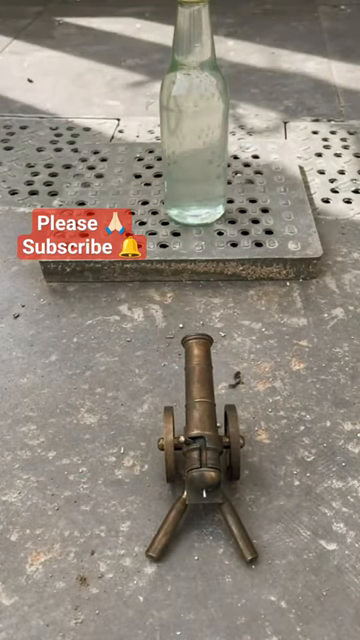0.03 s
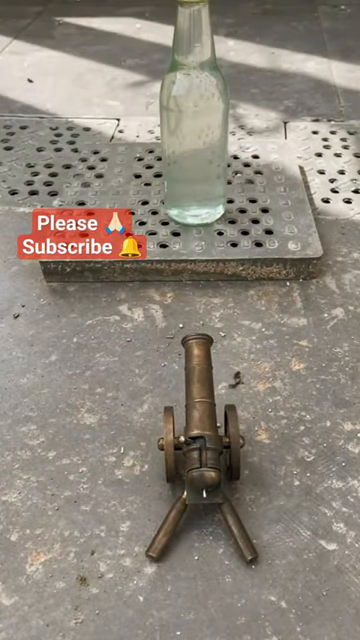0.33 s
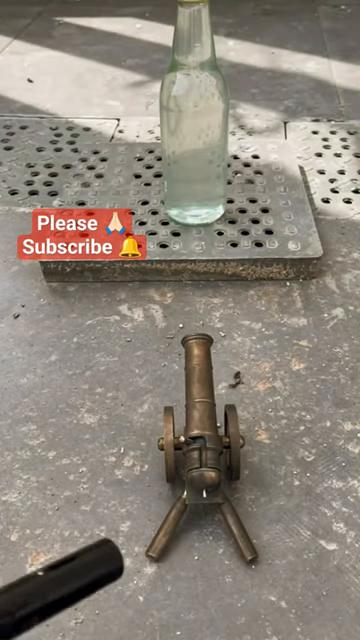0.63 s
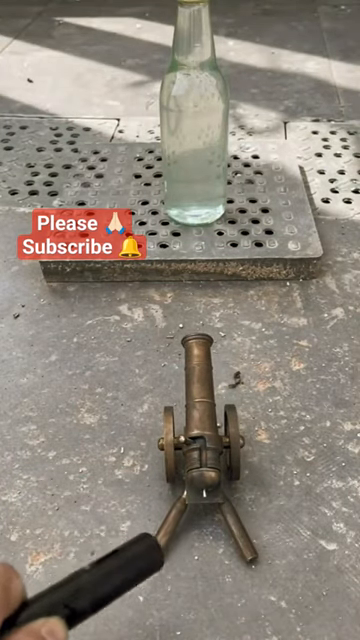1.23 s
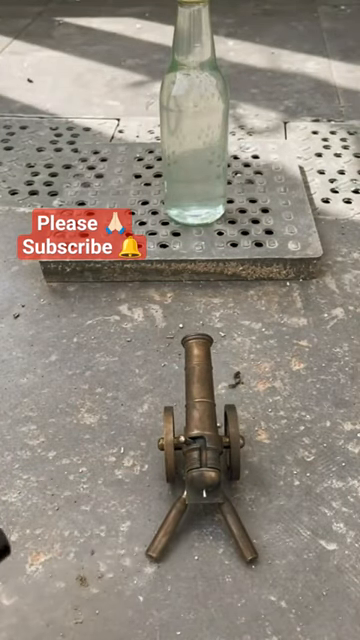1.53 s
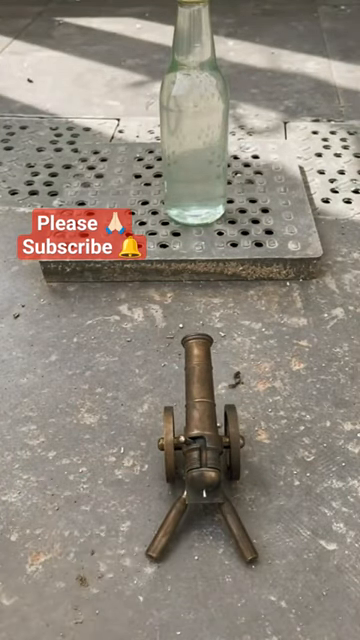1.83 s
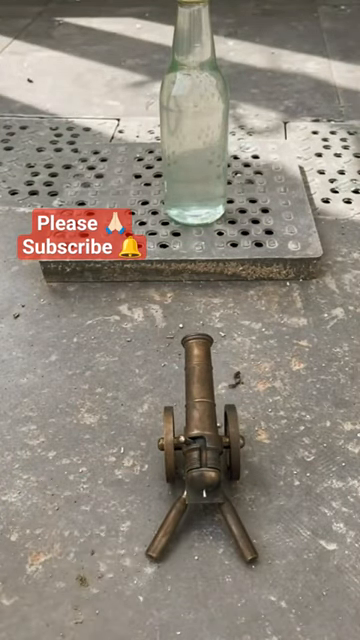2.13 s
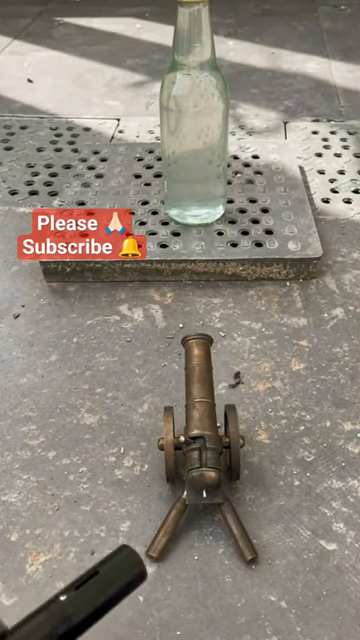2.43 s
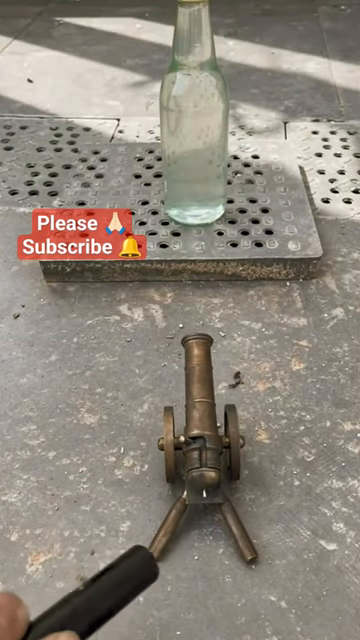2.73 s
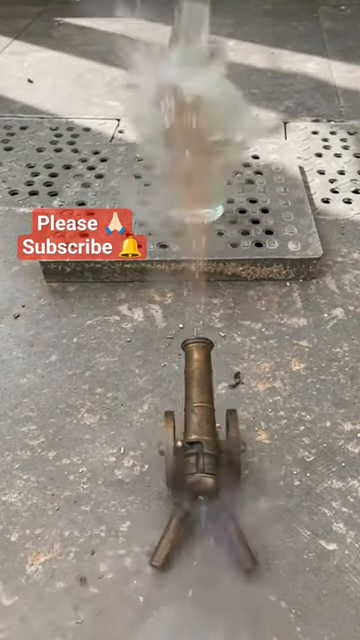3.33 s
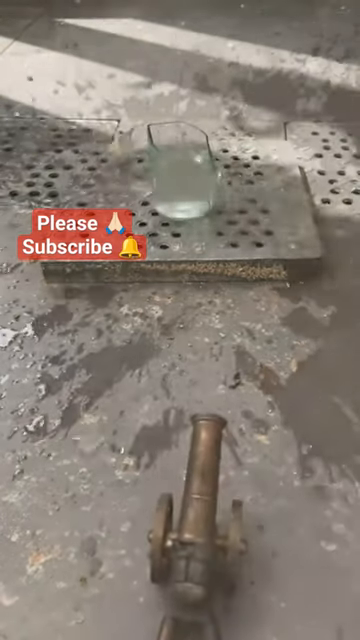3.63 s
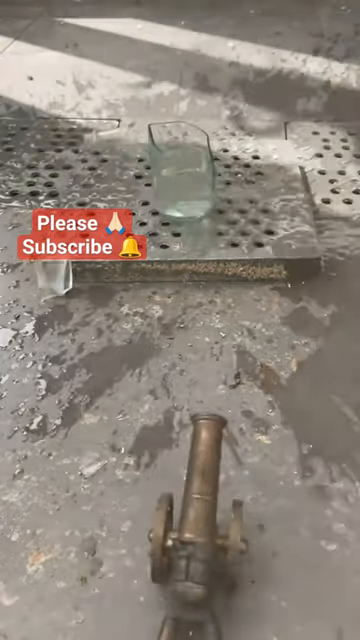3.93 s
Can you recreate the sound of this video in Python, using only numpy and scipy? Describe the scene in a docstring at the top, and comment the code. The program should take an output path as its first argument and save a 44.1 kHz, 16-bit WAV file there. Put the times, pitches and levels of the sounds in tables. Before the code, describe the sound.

A small brass cannon goes off with a sharp crack and low boom, after a close lighter click and a short sputter. A bottle bursts right after, with tinkling glass and splashing water, over wind or traffic rumble.

```python
"""Toy cannon and glass bottle

A toy brass cannon stands on a concrete floor outdoors, in a low rumble of wind or traffic.
A lighter snaps, the priming fizzes and spits, and the cannon fires with a crack and a low boom.
A glass bottle of water cracks and bursts; shards clink and water spatters over the ground."""
import sys
import numpy as np
from scipy import signal
from scipy.fft import rfft, irfft
from scipy.io import wavfile
from scipy.ndimage import uniform_filter1d

SR = 44100
rng = np.random.default_rng(int(sys.argv[2]) if len(sys.argv) > 2 else 0)


def to_wav(s):
    """Save 16-bit WAV."""
    ch = np.atleast_2d(s).T  # columns
    pcm = np.round(np.clip(ch, -1, 1) * 32767)  # PCM
    wavfile.write(sys.argv[1], SR, pcm.astype(np.int16))


N = 176400
T = np.arange(N) / SR
HIT_SAMPLES, LEAD_S = 16384, .03  # each one-shot peaks LEAD_S into its buffer
HIT_T = np.arange(HIT_SAMPLES) / SR - LEAD_S

# Vent jet, two muzzle surges, crack of the ball, a reflection: peak_s, level_db, rise_s, t60_s
BLASTS = [(3.412, -22, .0015, .06), (3.4205, -13.5, .003, .024), (3.4255, -18, .001, .016),
          (3.4345, -11.5, .0008, .02), (3.449, -21, .0015, .1)]
# Modes of the brass barrel: pitch_hz, level_db, t60_s
BARREL_MODES = [(2476, -25, .16), (3535, -28, .12), (4720, -33, .1), (5845, -30, .08), (6580, -30, .13)]
# Glass cracking and landing: peak_s, body_db, ring_db, treble_db, rise_s, t60_s
CRACKS = [(3.5845, -33, -23, -26, .0008, .05), (3.589, -40, -31, -24, .002, .04),
          (3.62, -37, -39, -46, .002, .06), (3.672, -41, -35, -39, .006, .1),
          (3.7018, -13, -12.5, -23, .0006, .026), (3.7075, -24, -26, -17, .001, .022),
          (3.726, -48, -38, -28, .003, .05), (3.767, -44, -37, -26, .003, .14),
          (3.807, -29, -33, -35, .002, .11), (3.951, -24, -39, -42, .001, .04)]
# Shards that ring out: peak_s, pitch_hz, level_db, t60_s
SHARDS = [(3.585, 4660, -32, .3), (3.585, 7745, -34, .12), (3.585, 9135, -33, .12), (3.665, 4270, -36, .2),
          (3.702, 3828, -36, .6), (3.704, 5000, -33, .3), (3.706, 4897, -32, .25), (3.74, 3016, -37, .35),
          (3.765, 9130, -27, .22), (3.765, 10950, -33, .22), (3.768, 8460, -33, .18), (3.77, 8095, -34, .2),
          (3.775, 10370, -33, .25), (3.772, 6720, -32, .4), (3.79, 1965, -36, .6), (3.8, 10165, -35, .2),
          (3.806, 6720, -32, .15), (3.838, 4657, -32, .2), (3.845, 3828, -33, .35), (3.875, 6720, -42, .4),
          (3.905, 7745, -40, .3), (3.925, 4998, -27, .18), (3.945, 5420, -33, .25), (3.952, 6720, -34, .2),
          (3.952, 4270, -39, .1)]
# Soft handling knocks and puffs of priming: peak_s, level_db, centre_hz, t60_s
KNOCKS = [(1.953, -27.5, 700, .055), (2.733, -33, 560, .03), (2.796, -30.5, 760, .05),
          (2.835, -32.5, 850, .03)]
SPUTTERS = [(3.122, -37, 800, .03), (3.166, -34, 1350, .05), (3.225, -38.5, 850, .04),
            (3.262, -37.5, 800, .05), (3.345, -30, 700, .06)]

# Fader moves: time_s, level_db
BOOM_FADER = [(3.48, -45), (3.53, -30), (3.56, -20), (3.59, -26), (3.64, -21), (3.69, -25), (3.73, -42)]
SPLASH_FADER = [(3.48, -48), (3.57, -46), (3.6, -36), (3.64, -37), (3.72, -34), (3.76, -34), (3.82, -31.5),
                (3.88, -35.5), (4, -37)]
CRUMB_FADER = [(3.47, -49), (3.54, -50), (3.62, -44), (3.69, -41), (3.74, -38), (3.79, -33), (3.83, -37),
               (3.87, -46), (3.93, -42), (4, -44)]
FIZZ_FADER = [(3.12, -55), (3.15, -39.5), (3.21, -39.5), (3.32, -39.5), (3.40, -38), (3.46, -52)]
RUMBLE_FADER = [(0, 0), (.6, -1.5), (1.6, 1), (2.4, .5), (3.0, -1), (3.42, -2), (3.5, -19), (3.76, -15),
                (3.86, -5), (4, -4.5)]
HISS_FADER = [(0, -61), (.4, -57), (.85, -54), (1.2, -55), (1.4, -51), (1.65, -55), (1.97, -52),
              (2.02, -59), (2.3, -61), (2.6, -57), (2.82, -51), (3.0, -52), (4, -55)]

# Tone colour of each layer: frequency_hz, relative_db
BLAST_EQ = [(40, 11), (110, 16), (250, 11), (600, 3), (1050, 5), (1700, -1), (2500, 1), (3600, -3),
            (4700, -7), (5300, -13), (5850, -6), (6300, -17), (6700, -4), (7150, -5), (7600, -22),
            (10500, -17), (13000, -19)]
TAIL_EQ = [(40, 6), (110, 7), (300, 3), (700, 5), (1300, 1), (2500, -1), (3100, -1), (3700, -5), (4700, -2),
           (5800, -15), (6900, -3), (7800, -24), (10500, -18), (13000, -21)]
GLASS_BODY_EQ = [(350, -14), (700, -8), (1100, -3), (1700, -2), (2250, 0), (2580, 0), (2850, -10),
                 (3400, -14)]
GLASS_RING_EQ = [(3300, -20), (3750, -4), (4000, -9), (4220, -1), (4450, -5), (4850, 1), (5150, -2),
                 (5500, -20)]
GLASS_TREBLE_EQ = [(5500, -40), (6400, -26), (6800, 3), (7500, 0), (8100, 1), (8900, -4), (10500, 0),
                   (11200, -16), (11900, -20), (12400, -7), (13200, -13)]
SPLASH_EQ = [(200, -3), (600, 2), (1000, 0), (1400, 0), (2300, 4), (2850, -5), (3150, 0), (3450, -4),
             (4000, -2), (5300, -1), (5700, -23), (6400, -25), (7000, -11), (10500, -15), (11500, -25),
             (12400, -3), (13200, -8)]
SPLINTER_EQ = [(1200, -6), (2300, -1), (3000, -3), (4000, 2), (5300, 2), (5600, -28), (6500, -28),
               (6800, -4), (11000, -5)]
LIGHTER_EQ = [(400, -19), (1000, -13), (1700, -15), (2050, -5), (2300, 2.5), (2600, 6), (2950, -5),
              (3350, 3), (3800, -4), (4700, -7), (5200, -4), (6100, -13), (7000, -4), (8100, 1.5),
              (9000, -4), (11000, -3.5), (13500, -5)]
FIZZ_EQ = [(300, -3), (800, 9), (1250, 3), (1800, 1), (2800, -8), (3600, -4), (5000, -1), (5700, -12),
           (6300, -14), (7000, -2), (9000, -8), (11000, -9), (11700, -20), (12500, -10), (13200, -14)]
SPIT_EQ = [(500, 0), (1200, -4), (1800, -8), (2640, -3), (3020, -11), (3500, 3), (4080, -12), (5500, -7),
           (6800, 2), (7800, 2), (9000, -4), (10500, 0), (13000, -6)]
RUMBLE_EQ = [(22, -24), (32, -17), (45, -8.5), (74, -.5), (110, 0), (160, -4), (260, -7), (310, -17),
             (370, -17), (470, -25), (750, -30), (1100, -36), (1500, -48), (2000, -54)]
HISS_EQ = [(400, -20), (1200, -2), (2000, 0), (3200, -2), (4300, 0), (5300, -1), (5800, -17), (6300, -18),
           (6700, -4), (8000, -8), (10700, -11), (11600, -22), (12400, -14), (13200, -18)]

# Stereo image of the shot, close sounds and open air (1 is mono): frequency_hz, correlation
SHOT_IMAGE = [(60, .97), (200, .75), (660, .1), (2200, .45), (5000, .6), (13000, .4)]
NEAR_IMAGE = [(200, .98), (1200, .93), (2200, .75), (5000, .6), (13000, .6)]
AIR_IMAGE = [(110, 1), (200, .993), (360, .95), (660, .72), (1200, .6), (2200, .7), (5000, .6),
             (13000, .55)]


def cannon():
    """Ragged blasts and a pressure push ring the barrel and leave a short tail."""
    out = np.zeros((2, N))
    for peak_s, db, rise_s, t60_s in BLASTS:
        place(out, peak_s, burst(db, rise_s, t60_s, BLAST_EQ, SHOT_IMAGE))
    first_surge_s, second_surge_s = BLASTS[1][0], BLASTS[2][0]
    place(out, second_surge_s, burst(db=-23, rise_s=.006, t60_s=.4, eq=TAIL_EQ, image=SHOT_IMAGE))
    barrel = sum(ring(hz, db, t60_s, rise_s=.005) for hz, db, t60_s in BARREL_MODES)
    place(out, first_surge_s, barrel)
    push_start_s, push_width_s = 3.4262, .0028
    age = np.maximum(T - push_start_s, 0) / push_width_s
    push = amp(-9) * np.minimum(10 * age, 1) * (1 - age) * np.exp(-age)  # pressure, then suction
    lean_left = amp([[1], [-1]])
    return out * lean_left + push


def boom():
    """A sub tone swells after the shot; a thump dives in pitch over it."""
    thump_s, top_hz, end_hz, fall_s, sub_hz = 3.594, 600, 60, .005, 47
    age_s = np.maximum(T - thump_s, 0)
    pitch_hz = end_hz + (top_hz - end_hz) * np.exp(-age_s / fall_s)
    envelope = np.minimum(age_s / .003, 1) * decay(age_s, t60_s=.1)
    thump = amp(-17) * envelope * np.sin(2 * np.pi * np.cumsum(pitch_hz * (age_s > 0)) / SR)
    sub = fader(BOOM_FADER) * np.sin(2 * np.pi * sub_hz * (T - thump_s))
    return thump + sub


def bottle():
    """The glass cracks, shards ring in beating pairs of modes, water and crumbs rain down."""
    water = fader(SPLASH_FADER) * shimmer(grains(SPLASH_EQ, NEAR_IMAGE), bands_db=5, flicker_db=1.2)
    crumbs = shimmer(grains(GLASS_TREBLE_EQ, NEAR_IMAGE), bands_db=7, flicker_db=1.5)
    out = water + fader(CRUMB_FADER) * crumbs
    for peak_s, *band_dbs, rise_s, t60_s in CRACKS:
        bands = zip(band_dbs, (GLASS_BODY_EQ, GLASS_RING_EQ, GLASS_TREBLE_EQ))
        crack = sum(burst(db, rise_s, t60_s, eq, NEAR_IMAGE) for db, eq in bands)
        place(out, peak_s, yard(crack))
    beat_hz = 23
    for peak_s, hz, db, t60_s in SHARDS:
        place(out, peak_s, ring(hz, db, t60_s, rise_s=.003))
        place(out, peak_s, ring(hz + beat_hz, db - 11, t60_s, rise_s=.003))
    return out + splinters()


def splinters(count=90, low_hz=1500, top_hz=11000):
    """Tiny bits of glass land at random, each a brief note riding the splash fader."""
    out, splash_gain = np.zeros((2, N)), fader(SPLASH_FADER)
    for when, pitch, softness, length, left in rng.random((count, 5)):
        peak_s = np.interp(when, [0, 1], [SPLASH_FADER[0][0], T[-1]])
        hz = low_hz + (top_hz - low_hz) * pitch
        db = -5.5 + curve_at(SPLINTER_EQ, hz) - 2.5 * np.log(.05 + softness)
        note = ring(hz, db, t60_s=.11 * (.5 + length), rise_s=.0003)
        pan = np.sqrt(.5 + np.array([[left], [1 - left]]))
        place(out, peak_s, splash_gain[int(peak_s * SR)] * note * pan)
    return out


def ignition():
    """Soft knocks, the snap of the lighter, then priming that fizzes, sputters and spits."""
    out = fader(FIZZ_FADER) * shimmer(grains(FIZZ_EQ, AIR_IMAGE), bands_db=4.5, flicker_db=2)
    for peak_s, db, centre_hz, t60_s in KNOCKS + SPUTTERS:
        eq = bell_eq(centre_hz, octaves=.33)
        place(out, peak_s, burst(db, rise_s=.0015, t60_s=t60_s, eq=eq, image=AIR_IMAGE))
    snap = burst(db=-11.8, rise_s=.0012, t60_s=.009, eq=LIGHTER_EQ, image=NEAR_IMAGE)
    place(out, peak_s=3.0583, sound=yard(snap))
    spit = burst(db=-17.5, rise_s=.002, t60_s=.03, eq=SPIT_EQ, image=NEAR_IMAGE)
    place(out, peak_s=3.3472, sound=yard(spit))
    return out


def yard(hit, wet_db=-16, t60_s=.16):
    """Floor and walls scatter short reflections behind a hit."""
    t = T[:HIT_SAMPLES]
    tail = rng.standard_normal((2, HIT_SAMPLES)) * (t > .002) * decay(t, t60_s)
    wet = signal.fftconvolve(hit, tail / np.linalg.norm(tail[0]), axes=1)
    return hit + amp(wet_db) * wet[:, :HIT_SAMPLES]


def outdoor_air():
    """A bed of wind or traffic rumble that dips after the shot, and a faint drifting hiss."""
    hiss = shimmer(noise(HISS_EQ, AIR_IMAGE, size=N), bands_db=3, flicker_db=1)
    rumble = amp(-21.5) * noise(RUMBLE_EQ, AIR_IMAGE, size=N)
    return fader(RUMBLE_FADER) * rumble + fader(HISS_FADER) * hiss


def burst(db, rise_s, t60_s, eq, image):
    """A short puff of noise."""
    return amp(db) * strike(rise_s, t60_s) * noise(eq, image)


def ring(hz, db, t60_s, rise_s):
    """One dying mode, reaching the two sides slightly out of step."""
    phase = 2 * np.pi * rng.random() + np.array([[0], [rng.uniform(-1, 1)]])
    return amp(db) * strike(rise_s, t60_s) * np.sin(2 * np.pi * hz * HIT_T + phase)


def grains(eq, image, ticks_per_s=2500, spread_db=3.5, wash=.6):
    """Dense tiny ticks of uneven size over a wash of noise."""
    ticks = (rng.random((2, N)) < ticks_per_s / SR) * rng.choice([-1, 1], (2, N))
    sizes = amp(spread_db * np.minimum(rng.exponential(1, (2, N)), 4))
    return tint(unit_rms(ticks * sizes) + wash * rng.standard_normal((2, N)), eq, image)


def noise(eq, image, size=HIT_SAMPLES):
    """Smooth stereo noise."""
    return tint(rng.standard_normal((2, size)), eq, image)


def shimmer(x, bands_db, flicker_db):
    """Lets narrow bands come and go, and the whole sound flicker."""
    spectrum = signal.stft(x, nperseg=512)[2]
    patches = uniform_filter1d(rng.standard_normal(spectrum.shape[1:]), size=3, axis=0)
    patches = unit_rms(uniform_filter1d(patches, size=9, axis=1))
    flicker = unit_rms(uniform_filter1d(rng.standard_normal(spectrum.shape[2]), size=3))
    gain = amp(bands_db * patches + flicker_db * flicker)
    return unit_rms(signal.istft(spectrum * gain, nperseg=512)[1][:, :N])


def tint(pair, eq, image):
    """Blends two unrelated signals as mid and side, then applies the EQ."""
    hz = np.fft.rfftfreq(pair.shape[1], 1 / SR)
    correlation = np.clip(curve_at(image, hz), -1, 1)
    mid, side = rfft(pair) * np.sqrt([1 + correlation, 1 - correlation])
    roll_off = np.minimum(hz / eq[0][0], 1) ** 2 / np.maximum(hz / eq[-1][0], 1) ** 3
    return unit_rms(irfft(np.array([mid + side, mid - side]) * amp(curve_at(eq, hz)) * roll_off))


def bell_eq(hz, octaves):
    """A bell around hz, 4 dB down at the given distance on either side."""
    return [(hz * 2 ** (k * octaves / 2), -k * k) for k in range(-5, 6)]


def curve_at(points, hz):
    """Reads a curve on a log-frequency axis."""
    point_hz, values = np.transpose(points)
    return np.interp(np.log(hz + 1), np.log(point_hz + 1), values)


def fader(points):
    """Gain over time, fading to silence just outside the first and last points."""
    time_s, db = np.transpose(points)
    fade_in = np.clip((T - time_s[0] + .05) / .02, 0, 1)
    fade_out = np.clip((time_s[-1] + .06 - T) / .02, 0, 1)
    return amp(np.interp(T, time_s, db)) * fade_in * fade_out


def strike(rise_s, t60_s):
    """A one-shot envelope: fast exponential attack, then decay."""
    return np.exp(np.minimum(HIT_T / rise_s, -HIT_T * np.log(1000) / t60_s).clip(-60, 0))


def decay(age_s, t60_s):
    """Falls 60 dB every t60_s."""
    return np.exp(-np.log(1000) * age_s / t60_s)


def place(mix, peak_s, sound):
    """Mixes in a one-shot so that its envelope peaks at peak_s."""
    slot = mix[:, round((peak_s - LEAD_S) * SR):][:, :HIT_SAMPLES]
    slot += sound[..., :slot.shape[1]]


def amp(db):
    """Decibels to gain."""
    return 10 ** (np.asarray(db) / 20)


def unit_rms(x):
    """Scales to rms 1."""
    return x / np.sqrt(np.mean(x ** 2) + 1e-20)


def scene():
    """Over the outdoor bed, the cannon is lit and fires, and the bottle bursts."""
    return outdoor_air() + ignition() + cannon() + boom() + bottle()


def record(dry):
    """Soft clipping rounds the highest peaks; a steep low-pass trims the top."""
    ceiling, cutoff_hz = amp(-2), 13300
    rounded = ceiling * np.tanh(dry / ceiling)
    low_pass = signal.firwin(301, cutoff_hz, window=("kaiser", 8), fs=SR)
    return signal.oaconvolve(rounded, low_pass[None], "same")


dry = scene()
out = record(dry)
to_wav(out)
```